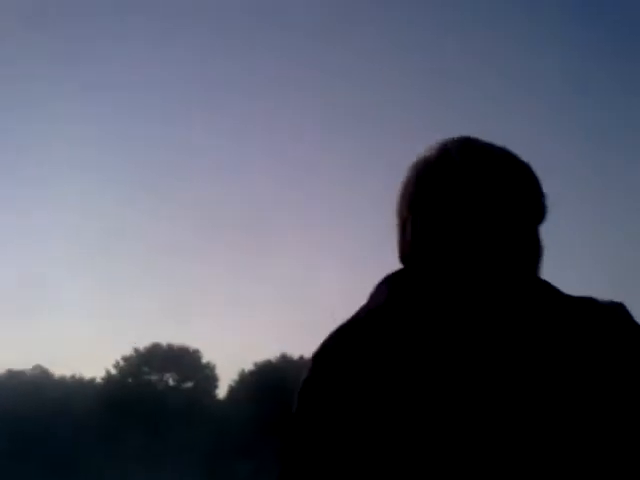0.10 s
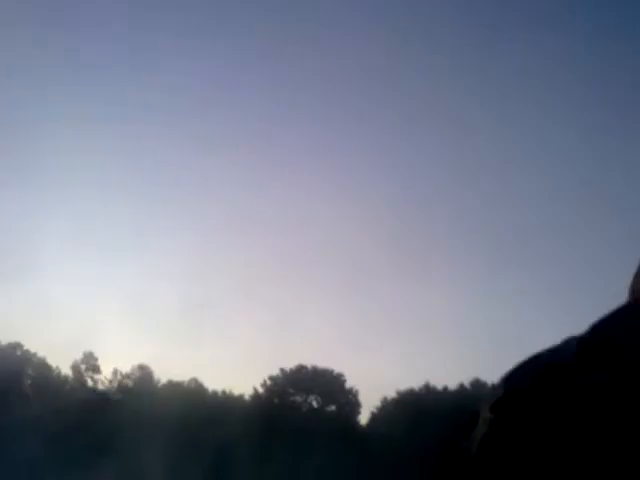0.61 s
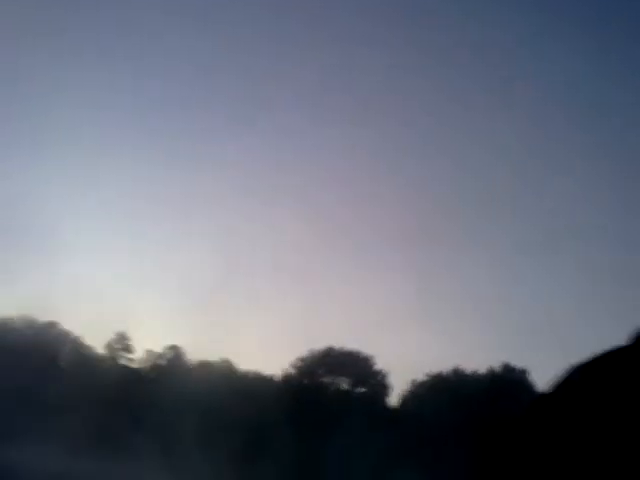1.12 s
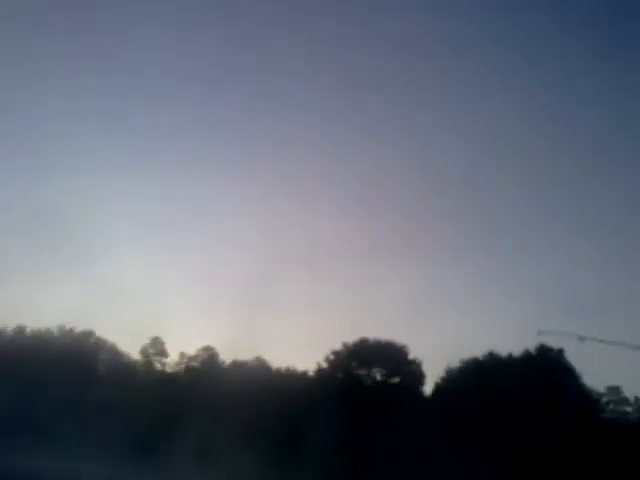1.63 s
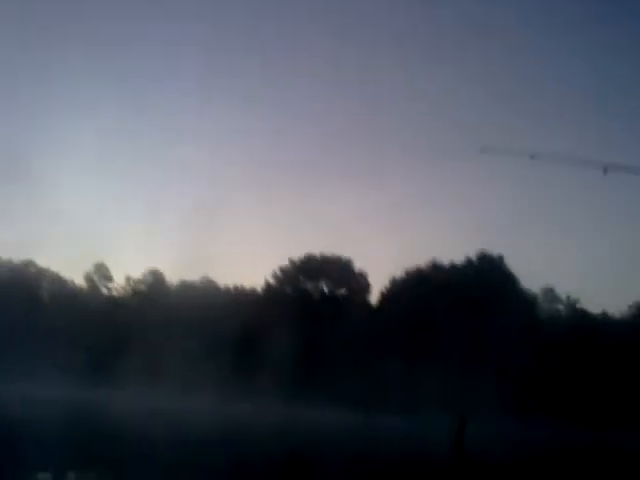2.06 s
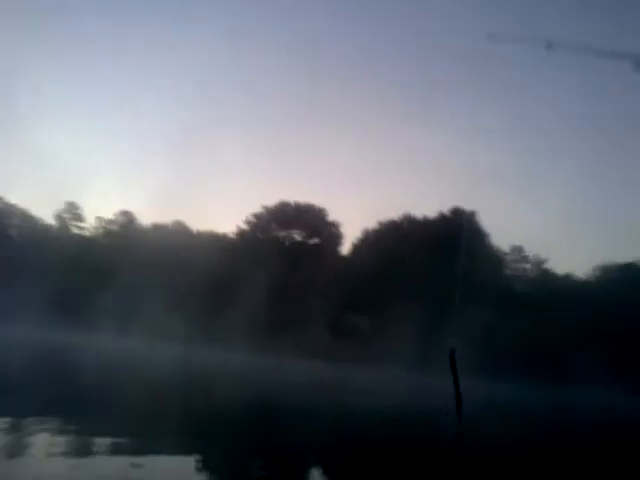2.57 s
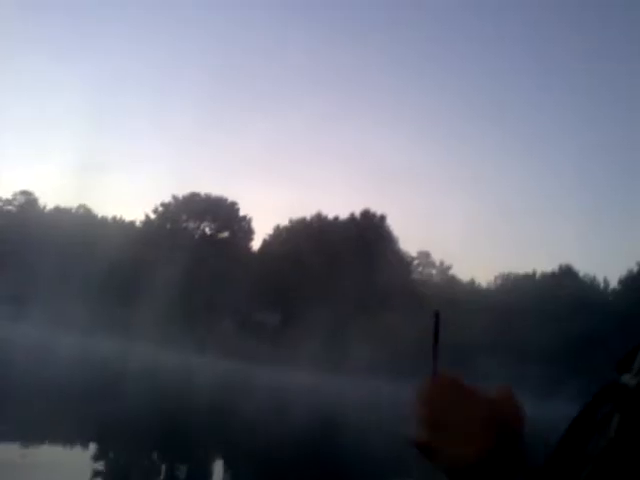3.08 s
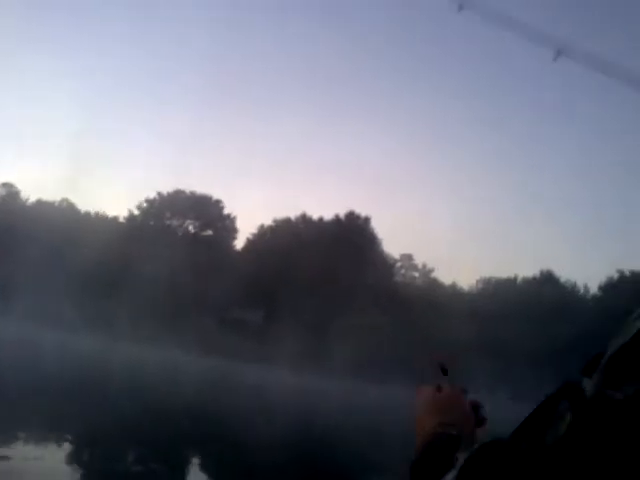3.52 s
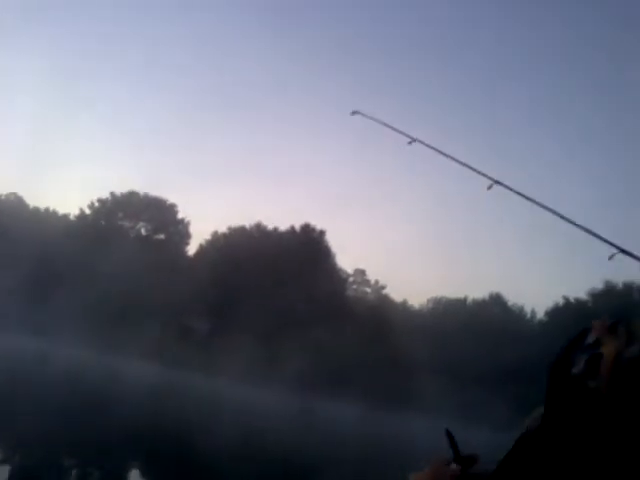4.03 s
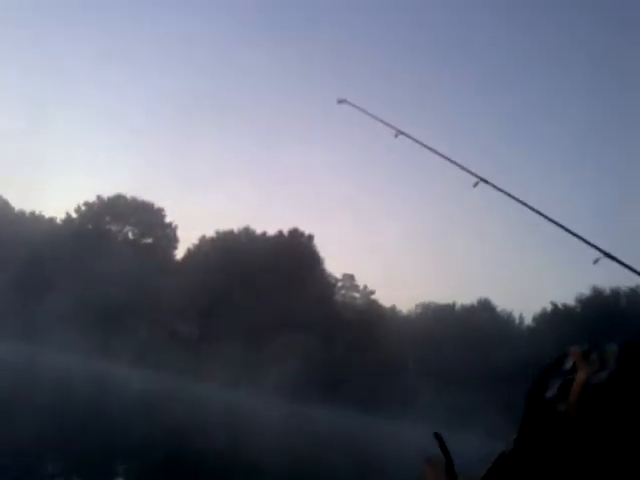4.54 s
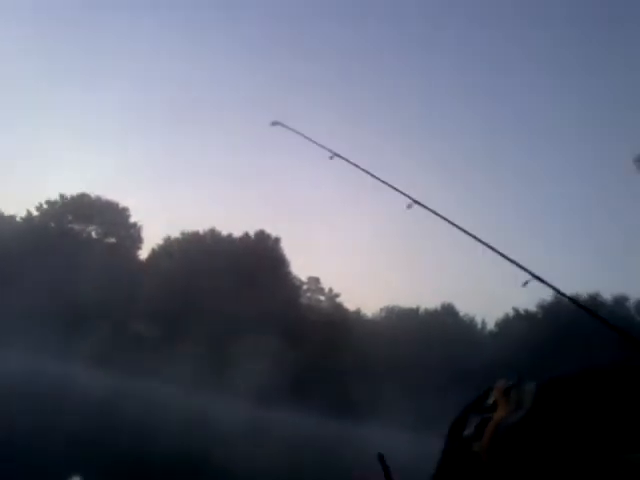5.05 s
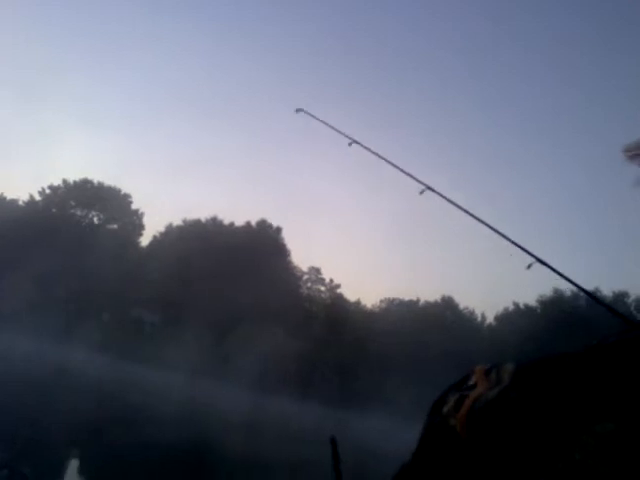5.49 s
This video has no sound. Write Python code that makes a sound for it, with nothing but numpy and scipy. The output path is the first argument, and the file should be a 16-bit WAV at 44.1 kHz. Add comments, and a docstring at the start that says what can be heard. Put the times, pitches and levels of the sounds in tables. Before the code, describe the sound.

Small birds whistle and chirp across a still lake at dawn over soft airy hiss. Around one to two seconds, close cloth rustles and crackles with sharp clicks and a dull hull thump. Then a nearer bird gives a short buzz and a rapid bright trill, with hoarse caws far behind. Later only sparse piping, faint ticks and hiss remain. Handheld stereo microphone in a small boat.

```python
"""A misty lake at dawn, heard from a small boat through the two microphone ports of a handheld camera.
Birds on the shore whistle, chip, buzz and trill as near-sines of moving pitch, with scattered echoes.
Far birds, caws, insects and the still air lie behind them, the last three as filtered noise.
Close by, cloth rustles and crackles as noise under strokes of effort, and gear ticks and knocks
against the hull as noise bursts and decaying sines."""
import sys
import numpy as np
from scipy import signal
from scipy.fft import rfft, irfft, next_fast_len
from scipy.io import wavfile
from scipy.ndimage import uniform_filter1d

SR = 44100
rng = np.random.default_rng(int(sys.argv[2]) if len(sys.argv) > 2 else 0)


def magnitude_from_level(level_db):
    """Linear magnitude for a level in decibels (20 dB per decade)."""
    exponent = np.asarray(level_db, float) / 20
    return 10 ** exponent


def unload_audio(sound):
    """Save the sound as a 16-bit wav file, at the path given as the first command line argument."""
    columns = np.transpose(np.atleast_2d(sound))
    # keep every value between -1 and 1, then stretch to whole-number steps
    steps = np.round(np.clip(columns, -1, 1) * 32767)
    wavfile.write(sys.argv[1], SR, steps.astype(np.int16))


N = 248459  # length of the scene in samples

# colour of the port pair: frequency_hz, left_minus_right_db
PORT_LEAN = [(300, 1.5), (3000, 1.5), (5500, 0.5), (7400, -24), (9500, -9), (14900, -7)]
# movements of cloth: peak_s, rise_s (over 30 dB), fall_s (over 30 dB), level_db, treble_lift_db
CLOTH_STROKES = [(0, .05, .16, -42, 0.1), (.49, .05, .75, -57, 3), (1.07, .15, .35, -46, 5),
                 (1.15, .1, .2, -41, 2), (1.185, .06, .3, -37, 7), (1.241, .03, .04, -34, 6),
                 (1.278, .12, .1, -29, 2.5), (1.302, .015, .04, -27, 4), (1.322, .07, .12, -27, 5),
                 (1.36, .2, .3, -30, 2.5), (1.408, .1, .06, -31, 0.1), (1.495, .15, .2, -37, 3.5),
                 (1.778, .015, .14, -40.5, 4), (1.958, .012, .15, -34, -26), (2.036, .01, .03, -42, 12),
                 (2.05, .015, .03, -40, 10), (2.065, .3, .33, -39, 1.5), (2.064, .015, .05, -42, 12),
                 (3.8, .2, .13, -51.5, 5.5)]
PORT_LAG_S = .0002  # delay between the ports
BUZZ_HZ = 222  # warble rate of the trilling bird


def evened(x):
    """Normalisation to unit root-mean-square."""
    return x / np.sqrt(np.mean(x ** 2) + 1e-20)


def smoothed(x, size):
    """Slow random drift: two running means of size samples act as a low-pass."""
    return uniform_filter1d(uniform_filter1d(x, size=size), size=size)


def read(points, hz):
    """Interpolation of a spectrum on a logarithmic frequency axis."""
    f, value = np.transpose(points)
    return np.interp(np.log(hz + 1), np.log(f + 1), value)


def add(mix, s, sound):
    """Superposition: mixes a sound in at s seconds."""
    part = mix[..., max(round(s * SR), 0):][..., :sound.shape[-1]]
    part += sound[..., :part.shape[-1]]


def band(x, lo_hz, hi_hz):
    """Causal resonance: a Butterworth band-pass."""
    return signal.sosfilt(signal.butter(2, [lo_hz, hi_hz], "band", fs=SR, output="sos"), x)


def sides(pan_db):
    """Level-difference panning at constant total power; positive is left."""
    pair = magnitude_from_level([[pan_db / 2], [-pan_db / 2]])
    return pair / np.sqrt(np.mean(pair ** 2))


def whistle(rows, warble=None, fade=0.0027):
    """Frequency modulation: a sine integrates its pitch; rows hold time s, pitch Hz, rms level dB."""
    s, hz, db = np.transpose(rows)[:3]
    t = np.arange(s[0], s[-1], 1 / SR)
    pitch = uniform_filter1d(np.interp(t, s, hz), size=64)
    if warble is not None:
        pitch = pitch + warble(t)
    fade_s = min(fade, (s[-1] - s[0]) / 4)
    edge = np.clip(np.minimum(t - s[0], s[-1] - t) / fade_s, 0, 1)
    envelope = np.sqrt(2) * magnitude_from_level(np.interp(t, s, db)) * np.sin(edge * np.pi / 2)
    return envelope * np.sin(2 * np.pi * np.cumsum(pitch) / SR)


def echoes(x, t60, per_s):
    """Scattered reflections off trees and water: decaying random taps, independent for each side."""
    t = np.arange(SR // 2) / SR
    present = rng.random((2, len(t))) < per_s / SR
    taps = rng.standard_normal((2, len(t))) * present * magnitude_from_level(-60 * t / t60)
    return signal.oaconvolve(x, taps / np.linalg.norm(taps, axis=1, keepdims=True), axes=1)[:, :N]


def ports(z, hz, alike, lag, lean):
    """Partial coherence: the right port mixes the left spectrum, lag s ahead, with one of its own."""
    same = np.clip(read(alike, hz), 0, 1)[:, None]
    shifted = z[0] * np.exp(2j * np.pi * hz * lag)[:, None]
    right = same * shifted + np.sqrt(1 - same ** 2) * z[1]
    tilt = magnitude_from_level(lean * read(PORT_LEAN, hz))[:, None]
    return np.array([z[0] * tilt, right]) / np.sqrt((1 + tilt ** 2) / 2)


def hiss(size, field_db, alike, lag, lean):
    """Short-time synthesis: random spectra shaped by field_db(hz, t) overlap into a pair of noises."""
    hop, hz = size // 4, np.fft.rfftfreq(size, 1 / SR)
    frames = 4 * N // size + 5
    real, imaginary = rng.standard_normal((2, 2, frames, len(hz))).swapaxes(2, 3)
    z = ports(real + 1j * imaginary, hz, alike, lag, lean)
    z = z * magnitude_from_level(field_db(hz[:, None], np.arange(frames) * size / 4 / SR))
    return signal.istft(z, nperseg=size, noverlap=size - hop)[1][:, :N]


def swells(rows, t):
    """Exponential growth and decay: power of each movement about its peak."""
    s, rise, fall, db = np.transpose(rows)[:4, :, None]
    return magnitude_from_level(db - 30 * np.maximum((s - t) / rise, (t - s) / fall)) ** 2 + 1e-16


def effort(rows):
    """Addition of powers: amplitude of all movements together, sample by sample."""
    t = np.arange(0, N / SR, .001)
    return np.interp(np.arange(N) / SR, t, np.sqrt(swells(rows, t).sum(0)))


def still_air():
    """Stationary coloured noise: lake murmur, far insects and microphone hiss, in drifting patches."""
    # spectral density: frequency_hz, relative_level_db
    murmur = [(20, 9), (60, 8), (110, -5.5), (231, -2), (394, -6.5), (600, -7.5), (900, -14.5), (1460, -15),
              (2500, -9.5), (4500, -16), (6200, -21), (7300, -18.5), (8600, -21), (13800, -20.5),
              (15000, -28)]
    # likeness of the ports: frequency_hz, coherence (0..1)
    alike = [(60, 0.3), (150, 0.45), (400, 0.63), (1000, 0.61), (3000, 0.36), (9000, 0.1)]

    def field_db(hz, t):
        patches = rng.standard_normal((len(t), len(hz))).T
        patches = uniform_filter1d(patches, size=14, axis=0)
        patches = uniform_filter1d(patches, size=16, axis=1)
        return read(murmur, hz) + 1.8 * evened(patches)
    return magnitude_from_level(-52.5) * evened(hiss(1024, field_db, alike, lag=-PORT_LAG_S, lean=0.36))


def insects():
    """Narrow-band noise: a thin whine from the right bank that swells and thins."""
    centre_hz, half_width_hz, level_db = 7357, 97, -65
    whine = band(rng.standard_normal((2, N)), centre_hz - half_width_hz, centre_hz + half_width_hz)
    swell_db = 2.5 * evened(smoothed(rng.standard_normal(N), 3000))
    return magnitude_from_level(level_db + swell_db) * sides(-12) * evened(whine)


def chorus():
    """Superposition of many far birds: brief random glides and arches, half lost in diffuse echo."""
    # swelling and thinning: time_s, level_db
    loudness = [(0, -62.5), (.9, -59), (1.6, -60), (2.2, -55), (2.6, -54), (3.301, -55.5), (3.8, -58),
                (4.05, -67), (4.35, -67), (4.6, -61), (5.001, -58.5), (5.398, -61.5), (5.63, -58.5)]
    centre_hz, notes_per_s = 2800, 160
    out = np.zeros((2, N))
    for s, low, high, glide, arch, long, loud, pan in rng.random((round(notes_per_s * N / SR), 8)):
        hz, length = centre_hz * 2 ** (0.4 * (high - low)), 0.0149 + .03 * long
        middle_hz = hz * (1 + 0.154 * (arch - .4))
        end_hz = hz * (1 + 0.275 * (glide - .45))
        rows = [(0, hz, 0), (length / 2, middle_hz, 0), (length, end_hz, 0)]
        add(out, s * N / SR, magnitude_from_level(-12 * loud) * sides(10 * (pan - .3)) * whistle(rows))
    level_db = np.interp(np.arange(N) / SR, *np.transpose(loudness))
    return magnitude_from_level(level_db) * evened(out + magnitude_from_level(3) * echoes(out, t60=0.66, per_s=2500))


def rustle():
    """Stick-slip friction: fibres slip in clumps, a flickering noise with its own brightness per stroke."""
    # spectral density: frequency_hz, relative_level_db
    cloth = [(60, -49), (150, -41), (390, -3), (650, -6), (830, -6), (1200, -7.5), (2000, -14.5),
             (3300, -13.5), (5600, -22.5), (7440, -16.5), (9500, -26.5), (15000, -39)]
    # likeness of the ports for sounds in the boat: frequency_hz, coherence (0..1)
    alike_near = [(60, .3), (130, .85), (400, .9), (1000, .68), (3000, .55), (9000, .3)]

    def field_db(hz, t):
        # slips felt in the body and in the treble
        low, high = np.minimum(rng.exponential(1, (len(t), 2)).T, 3) - 1
        upward = np.clip(np.log2((hz + 1) / 700) / 4, 0, 1)  # share of the treble lift
        body_db = 3.6 * (1 - upward) * uniform_filter1d(low, size=3)
        treble_db = 5.5 * upward * uniform_filter1d(high, size=2)
        power = swells(CLOTH_STROKES, t)
        lift_db = np.transpose(CLOTH_STROKES)[4] @ power / power.sum(0)
        return read(cloth, hz) + upward * lift_db + body_db + treble_db
    return effort(CLOTH_STROKES) * evened(hiss(256, field_db, alike_near, lag=PORT_LAG_S, lean=0.89))


def hull_booms():
    """Low-frequency resonance: weight shifting in the hull stirs a band of noise, mostly in phase."""
    # shifts of weight: peak_s, rise_s (over 30 dB), fall_s (over 30 dB), level_db
    shifts = [(0, .05, .15, -39), (.1, .2, .25, -52), (1.15, .5, 1.6, -55), (1.41, .13, .07, -41.5),
              (1.958, .018, .2, -38), (2.11, .35, .3, -40)]
    boom = evened(band(rng.standard_normal((N, 2)).T, 170, 305))
    middle, side = boom
    return (middle + 0.2 * side * np.array([[1], [-1]])) * effort(shifts)


def crackle():
    """Impulsive noise: single fibres snap sparsely and unevenly, as loud as the stroke that makes them."""
    snaps_per_s, level_db, spread_db = 250, -10, 3.5
    when, size, rasp = rng.random(N), rng.exponential(1, N), rng.standard_normal((2, N))
    snaps = (when < snaps_per_s / SR) * magnitude_from_level(spread_db * np.minimum(size, 4))
    decay = magnitude_from_level(-60 * np.arange(800) / SR / .012)
    puffs = signal.oaconvolve(snaps, decay)[:N] * (rasp[0] + .8 * rasp)
    sound = band(puffs, 350, 1800) + magnitude_from_level(-10) * sides(-12) * band(puffs, 4500, 9500)
    return magnitude_from_level(level_db) * effort(CLOTH_STROKES) * evened(sound)


def note(s, length, pitch, db, attack=.35, release=.3):
    """Pitch contour pitch(u) over u = 0..1, soft at both ends and panned by level difference."""
    # the camera turns and the shore birds drift, mostly leftward: time_s, left_minus_right_db
    heading = [(0, -3), (.6, -3), (1.1, -6), (1.7, 3), (2.5, 4), (3.6, 9), (5.0, 8), (5.63, 3)]
    u = np.linspace(0, 1, 9)
    swell = np.clip(np.minimum(u / attack, (1 - u) / release), 0, 1)  # attack, release: shares of length
    height = np.clip((pitch(u).mean() - 4800) / 2200, 0, 1)
    pan_db = np.interp(s, *np.transpose(heading)) - 22 * height  # high notes favour the right port
    wandering = pitch(u) * (1 + .007 * rng.standard_normal(len(u)))
    rows = np.transpose([u * length, wandering, db - 9 * (1 - swell)])
    return s, sides(pan_db) * whistle(rows)


def whistles():
    """Nearly pure tones of the shore birds: piped notes, sweeps and two-voiced wheezes."""
    # piped notes, held almost level: start_s, length_s, pitch_hz, relative_level_db
    pipes = [(0, .075, 2605, -46), (.065, .075, 1865, -54), (.19, .13, 2620, -48.5), (.25, .105, 1830, -53),
             (.355, .04, 1510, -59), (.41, .08, 1815, -60), (.465, .135, 2580, -48), (.68, .035, 2590, -56),
             (.725, .14, 2575, -46), (.985, .125, 2600, -47), (1.63, .06, 2560, -63),
             (1.97, .12, 2590, -50), (2.22, .1, 2600, -56), (2.42, .18, 2610, -55), (2.72, .14, 2570, -56),
             (2.94, .06, 2520, -60), (3.37, .13, 2600, -59), (3.46, .035, 1600, -60),
             (3.64, .05, 1615, -58), (3.82, .07, 1625, -63), (3.87, .08, 2960, -60), (3.93, .07, 2570, -62),
             (4.115, .13, 2530, -55), (4.365, .125, 2490, -59), (4.56, .16, 2520, -62),
             (4.75, .12, 2650, -57), (4.8, .17, 2540, -61), (5.03, .1, 2610, -58), (5.445, .13, 2590, -48),
             (5.605, .025, 2550, -55)]
    # sweeping whistles: start_s, length_s, from_hz, to_hz, relative_level_db
    sweeps = [(.035, .025, 4200, 4950, -58), (.2, .03, 1800, 1450, -60), (.28, .02, 3600, 3650, -59),
              (.55, .04, 3500, 3600, -59), (.615, .025, 4000, 4400, -60), (.57, .013, 5100, 5850, -56),
              (.583, .013, 5850, 5200, -57), (.91, .065, 3400, 4500, -63), (.49, .035, 3350, 2850, -58),
              (.64, .025, 3050, 2950, -59), (.685, .03, 2950, 3050, -59), (.77, .04, 3350, 3500, -61),
              (.835, .02, 3250, 2800, -58), (.955, .04, 3800, 3300, -59), (5.51, .025, 3000, 2800, -60),
              (1.1, .04, 2800, 3000, -54), (1.145, .085, 3250, 3750, -44.5), (1.62, .045, 3500, 4500, -57),
              (1.665, .03, 3200, 3050, -53), (1.705, .02, 3640, 4280, -52), (1.8, .022, 2900, 4270, -46),
              (2.218, .042, 4800, 3100, -51), (2.25, .18, 3100, 2630, -50.5), (2.34, .11, 2250, 2620, -55),
              (2.52, .1, 2150, 2330, -59), (2.265, .09, 5950, 5150, -62), (2.34, .228, 5230, 4000, -53),
              (2.77, .07, 3050, 3250, -51), (2.9, .08, 4050, 4050, -60), (3.2, .13, 2950, 3250, -58),
              (3.5, .07, 3200, 2500, -50.5), (3.58, .1, 3050, 2950, -59), (3.76, .04, 3050, 3150, -56),
              (3.76, .035, 3290, 2900, -50.5), (2.46, .1, 2900, 3550, -60), (2.63, .12, 2800, 3100, -60),
              (2.93, .08, 3050, 2980, -59), (3.925, .027, 4700, 5600, -61), (4.355, .02, 3800, 3200, -62),
              (4.69, .025, 2900, 3450, -60), (4.87, .04, 7200, 6750, -62), (4.595, .02, 2300, 2700, -58),
              (5.01, .025, 3000, 3500, -60), (5.115, .04, 2250, 2450, -58), (5.14, .02, 2400, 1850, -60),
              (5.245, .1, 2510, 2630, -53), (5.31, .04, 2600, 2250, -57), (5.455, .025, 7300, 5900, -63),
              (5.305, .03, 7200, 6700, -55), (5.335, .06, 6750, 7100, -54), (5.34, .07, 8100, 7600, -55),
              (5.335, .02, 2800, 3400, -57), (5.355, .03, 2700, 2350, -51), (5.41, .065, 7750, 7100, -56),
              (5.41, .05, 7100, 6750, -59), (5.575, .03, 2700, 3700, -60)]
    # thin wheezes: start_s, length_s, upper_relative_db, lower_relative_db
    wheezes = [(.11, .19, -68, -57), (.755, .24, -56, -63), (1.675, .17, -55, -60), (2.33, .17, -61, -68),
               (3.765, .12, -63, -59), (4.46, .18, -71, -68), (5.16, .15, -70, -65)]
    # the two voices of a wheeze: share_of_length, upper_hz, lower_hz
    wheeze_pitch = [(0, 7900, 6560), (.3, 8060, 6790), (1, 7450, 6560)]
    out, (share, upper, lower) = np.zeros((2, N)), np.transpose(wheeze_pitch)
    for s, length, hz, db in pipes:
        def piped(u):
            end_drop = .05 * np.clip(1 - (1 - u) / .13, 0, 1)  # a drop by a share at the very end
            return hz * (1 - end_drop) - 380 * length * (u - .5)  # sag of 380 Hz per s
        add(out, *note(s, length, piped, db, attack=.25, release=.2))
    for s, length, hz, end_hz, db in sweeps:
        # a power under 1: the sweep moves fastest at its start
        add(out, *note(s, length, lambda u: hz + (end_hz - hz) * u ** .7, db))
    for s, length, upper_db, lower_db in wheezes:
        add(out, *note(s, length, lambda u: np.interp(u, share, upper), upper_db, attack=.1))
        add(out, *note(s, length, lambda u: np.interp(u, share, lower), lower_db, attack=.1))
    return out


def ticks():
    """Impact excitation: each blow is a short crack in middle and treble, and a modal ring of the hull."""
    # blows: start_s, middle_db, bass_db, treble_db
    blows = [(.158, -48, -60, -48), (0.579, -45, -57, -33), (0.626, -38, -46, -50), (0.808, -40, -56, -54),
             (1.06, -40, -50, -36), (1.18, -36, -50, -36), (1.24, -29, -42, -34), (1.3, -24, -34, -30),
             (1.318, -24, -34, -29), (1.4, -27, -36, -40), (1.486, -21, -25, -27), (1.525, -36, -36, -50),
             (1.56, -35, -36, -43), (1.773, -27, -45, -35), (1.816, -35, -51, -42),
             (1.953, -31, -22.5, -50), (2.139, -48, -41, -35), (2.344, -40.5, -61, -60),
             (2.933, -40, -54, -41), (3.494, -35, -54, -36.5), (3.506, -43, -64, -43),
             (3.678, -35.5, -58, -36), (3.724, -41, -63, -49), (3.763, -48, -63, -38),
             (3.802, -38, -52, -55), (5.072, -46, -50, -64)]
    # modes of the hull: frequency_hz, relative_level_db, t60_s
    modes = [(227.6, -8, 0.094), (422, -1.5, 0.048), (625, -6, 0.065)]
    out, t = np.zeros((2, N)), np.arange(8000) / SR
    ring = sum(magnitude_from_level(db - 60 * t / t60) * np.sin(2 * np.pi * hz * t) for hz, db, t60 in modes)
    ring = ring * np.minimum(t / 0.0028, 1)
    for (s, mid_db, bass_db, treble_db), burst in zip(blows, rng.standard_normal((len(blows), 2, len(t)))):
        burst = .6 * burst[0] + .6 * burst  # mostly shared by the ports
        crack = band(burst * magnitude_from_level(-60 * t / 0.05) * np.minimum(t / 0.0012, 1), 660, 3340)
        thud = ring + 1.64 * band(burst[0] * magnitude_from_level(-60 * t / 0.09), 375, 1000)
        click = sides(-12) * band(burst * magnitude_from_level(-60 * t / 0.02), 4900, 10000)
        add(out, s, magnitude_from_level(mid_db) * crack + magnitude_from_level(bass_db) * thud + magnitude_from_level(treble_db) * click)
    return out


def caws():
    """Source-filter voice: rough, lumpy noise through two throat resonances, smeared by the distance."""
    # hoarse calls: start_s, length_s, relative_level_db, upper_resonance_hz
    calls = [(.47, .2, -62, 1300), (2.7, .13, -62, 1300), (2.83, .2, -57, 1300), (3.05, .4, -64, 1380),
             (3.76, .12, -61, 1350), (4.42, .07, -63, 1300), (4.48, .18, -61.5, 1520),
             (4.76, .24, -63, 1330), (5.065, .06, -62, 1650)]
    low_hz, half_width_hz, edge_s = 530, 170, .015
    out, t = np.zeros((2, N)), np.arange(SR // 2) / SR
    for (s, length, db, hz), (rasp, lumps) in zip(calls, rng.standard_normal((len(calls), 2, len(t)))):
        drive = rasp * magnitude_from_level(4.0 * evened(smoothed_once(lumps)))
        throat = sum(evened(band(drive, f - half_width_hz, f + half_width_hz)) for f in (low_hz, hz))
        add(out, s, magnitude_from_level(db) * throat * np.clip(np.minimum(t, length - t) / edge_s, 0, 1))
    return magnitude_from_level(-5) * out + echoes(out, t60=.4, per_s=2000)


def smoothed_once(lumps):
    """Low-pass by one running mean: the lumps of a rough voice."""
    return uniform_filter1d(lumps, size=600)


def knocks():
    """Damped oscillation: dull knocks stir the air in the hull for a few cycles of one low note."""
    # knocks: start_s, pitch_hz, peak_db
    blows = [(.595, 70, -41), (.627, 380, -33), (3.451, 245, -42)]
    out, t = np.zeros(N), np.arange(SR // 4) / SR
    for s, hz, db in blows:
        t60 = .05 * 250 / hz  # higher notes die sooner
        add(out, s, magnitude_from_level(db - 60 * t / t60) * np.sin(2 * np.pi * hz * t))
    return out


def chips():
    """Multiple reflection: a steep upward chip comes back many times off nearby branches."""
    # one chip: time_s (from its start), pitch_hz, relative_level_db
    chip = [(0, 6050, -9), (.003, 6902, -4.5), (.0055, 7696.5, -0.5), (.009, 8400, -5)]
    # calls: start_s, level_db, echo_db (sent to the echoes, relative to the call)
    calls = [(0.6768, -35, 5), (1.404, -38, 10), (2.307, -50, 8), (4.4314, -39.5, -5), (5.606, -42, -1)]
    direct, scattered = np.zeros((2, 2, N))
    for s, db, echo_db in calls:
        call = magnitude_from_level(db) * sides(-18) * whistle(chip, fade=0.0019)
        add(direct, s, call)
        add(scattered, s, call * magnitude_from_level(echo_db))
    branches = echoes(scattered, t60=.09, per_s=700)
    return direct + branches + magnitude_from_level(-5.5) * echoes(scattered, t60=0.38, per_s=1700)


def leaned(x):
    """Port response as a linear filter: the right port favours the treble."""
    size = next_fast_len(N)
    response = magnitude_from_level(read(PORT_LEAN, np.fft.rfftfreq(size, 1 / SR)))
    return np.array([irfft(rfft(x, size) * response, size)[:N], x])


def trilling_bird():
    """Fast frequency modulation: a warbled buzz, throbbing in a throat band, leads into a trill."""
    # the buzz: time_s, pitch_hz, level_db, warble_depth_hz
    buzz = [(2.638, 5250, -69, 0), (2.659, 4920, -39, 60), (2.674, 4745, -41.5, 310),
            (2.71, 4740, -44.5, 310), (2.736, 4650, -54, 300)]
    # a syllable's warbled arch: time_s (from its start), pitch_hz, relative_level_db
    arch = [(0, 3900, -16), (.006, 4300, -12), (.0115, 4770, 3), (.0165, 4750, -2), (.0205, 4300, -10)]
    # a syllable's rising whistle: time_s (from its start), pitch_hz, relative_level_db
    rising = [(.025, 4930, -11), (.029, 5400, -5), (0.032, 6300, -3.5), (.043, 6730, 1.5), (.051, 6950, -3),
              (0.055, 7150, -8), (0.061, 8300, -8)]
    # trill syllables: arch_db, rise_db, rise_pitch_factor, rise_warble_depth_hz (left over from the buzz)
    syllables = [(-44, -44, 1.025, 260), (-45, -40, 1.0, 40), (-45, -39, 1.0, 30), (-43, -41, 1.0, 30),
                 (-45, -44.5, .99, 40), (-50, -49.5, .98, 40), (-53, -52, .97, 40)]
    trill_start_s, period_s, arch_warble_hz = 2.7505, .0742, 330
    singer = np.zeros(N)
    s, depth_hz = np.transpose(buzz)[[0, 3]]
    buzzing = whistle(buzz, lambda t: np.interp(t, s, depth_hz) * np.sin(2 * np.pi * BUZZ_HZ * t))
    add(singer, s[0], band(buzzing, 4480, 5150))  # the throat band turns the warble into a throb
    turns = rng.random(len(syllables))
    for k, ((arch_db, rise_db, lift, left_hz), turn) in enumerate(zip(syllables, turns)):
        start = trill_start_s + k * period_s

        def shake(t):
            return np.sin(2 * np.pi * (BUZZ_HZ * t + .3 * turn))
        arched = whistle(arch, lambda t: arch_warble_hz * shake(t), fade=.003)
        risen = whistle(np.multiply(rising, [1, lift, 1]), lambda t: left_hz * shake(t), fade=0.0041)
        add(singer, start, magnitude_from_level(arch_db) * arched)
        add(singer, start + rising[0][0], magnitude_from_level(rise_db) * risen)
    return sides(-7) * leaned(singer)


def rattle():
    """Periodic repetition: a far bird repeats one hooked note, each a little weaker on average."""
    # the hooked note: time_s (from its start), pitch_hz, relative_level_db
    hook = [(0, 3570, -5), (.004, 4350, 2), (.008, 4600, 7.5), (.023, 4640, 7.5)]
    start_s, period_s = 3.995, .0289
    out = np.zeros((2, N))
    for k, (wobble, waver) in enumerate(rng.standard_normal((18, 2))):
        rows = np.multiply(hook, [1, 1 + .005 * waver, 1])
        level = magnitude_from_level(-67 - 0.3 * k + 1.5 * wobble)
        add(out, start_s + k * period_s, level * sides(11) * whistle(rows, fade=0.004))
    return out


def hoots():
    """Steady low tones: short hoots far off, equal at both ports."""
    # hoots: start_s, relative_level_db
    calls = [(5.408, -57.5), (5.47, -55), (5.534, -55), (5.59, -53)]
    out = np.zeros((2, N))
    for s, db in calls:
        add(out, s, magnitude_from_level(db) * whistle([(0, 587, 0), (.03, 587, -1.5)], fade=0.0083))
    return out


def songbirds():
    """Direct-to-reverberant ratio: the trilling bird is closer, so drier than the other singers."""
    air_db = evened(smoothed(rng.standard_normal((N, 2)).T, 500))
    far = (whistles() + rattle()) * magnitude_from_level(1.8 * air_db)  # moving air makes far notes flutter
    far = far + hoots()
    near = trilling_bird()
    early = echoes(far + magnitude_from_level(-4) * near, t60=0.15, per_s=1900)
    late = echoes(far + magnitude_from_level(-8) * near, t60=1.1, per_s=2500)
    return magnitude_from_level(-2.0) * far + near + magnitude_from_level(-9) * early + magnitude_from_level(-5) * late


def scene():
    """Superposition of the birds over the still lake and the near sounds in the boat."""
    shore = still_air() + insects() + songbirds() + chips() + chorus() + caws()
    boat = rustle() + hull_booms() + crackle() + ticks() + knocks()
    return shore + boat


def band_limit(x):
    """A steep low-pass at the top of the band."""
    return signal.sosfilt(signal.butter(12, 15490, fs=SR, output="sos"), x)


def record(dry):
    """Band limitation: the microphones drop the deep bass, and a steep low-pass ends the treble."""
    high_pass = signal.butter(3, 130, "high", fs=SR, output="sos")
    thin = signal.sosfilt(high_pass, dry) + magnitude_from_level(-26) * dry  # a little deep bass remains
    low_pass = signal.firwin(511, 14680, window=("kaiser", 9), fs=SR)
    mix = signal.oaconvolve(thin, low_pass[None], "same")
    return band_limit(mix)


dry = scene()
out = record(dry)
unload_audio(out)
```